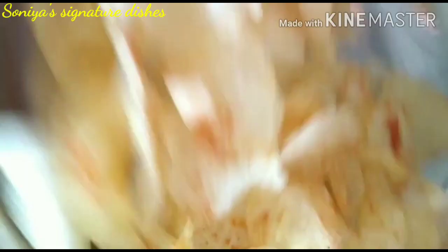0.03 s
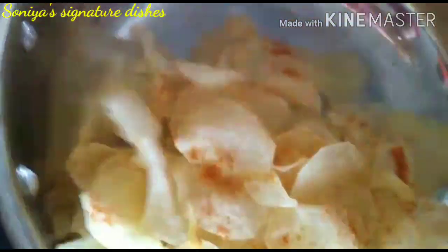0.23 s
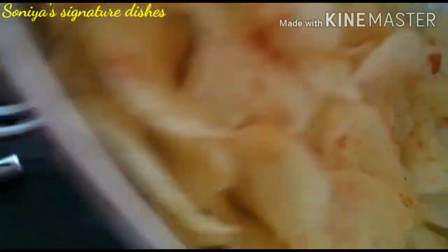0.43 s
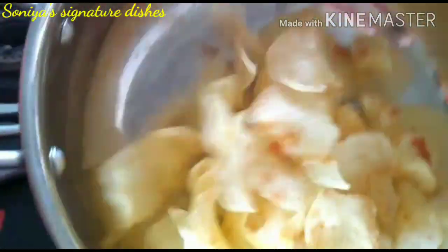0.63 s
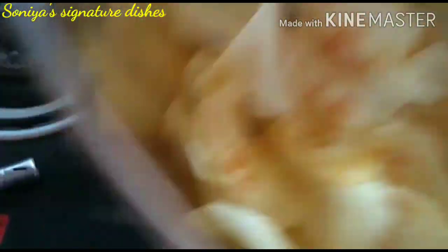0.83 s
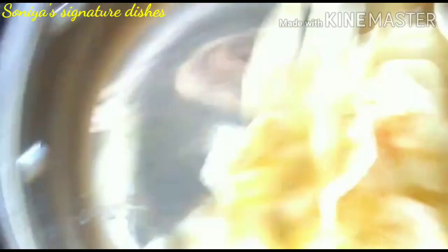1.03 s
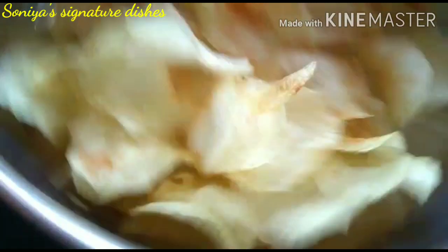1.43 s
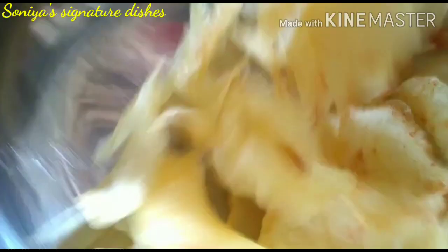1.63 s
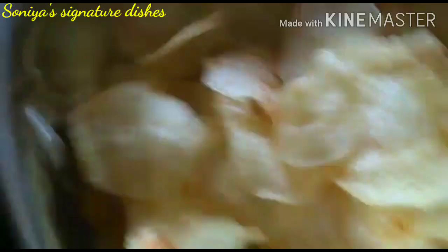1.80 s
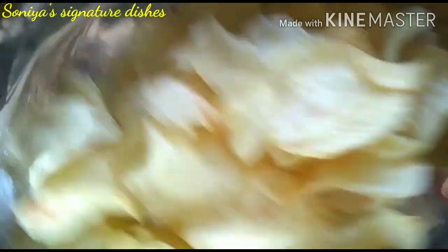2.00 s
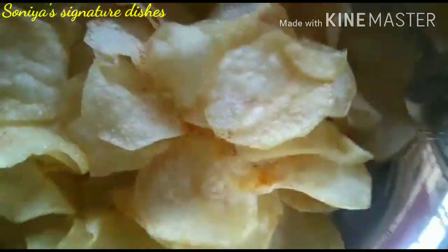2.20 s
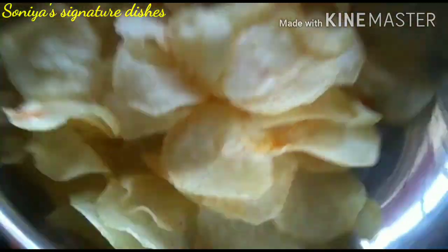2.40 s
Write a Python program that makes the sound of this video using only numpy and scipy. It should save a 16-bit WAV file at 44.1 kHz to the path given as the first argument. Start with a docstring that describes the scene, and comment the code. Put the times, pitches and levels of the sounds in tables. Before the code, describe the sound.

Crisp potato chips tossed in a steel pan, rustling and crackling in quick swells.

```python
"""Crisp potato chips are tossed in a steel pan in a kitchen, close to a two-port microphone.
Each toss is a swell of tiny brittle taps over a sliding rustle, and then the chips settle.
Single chips snap as they crack, or chatter as they slide. The pan rings faintly under them,
the nearby walls answer, and a low kitchen rumble with a hum goes on throughout."""
import sys
import numpy as np
from scipy import signal
from scipy.fft import rfft, irfft, next_fast_len
from scipy.io import wavfile
from scipy.ndimage import map_coordinates

SR = 44100
rng = np.random.default_rng(int(sys.argv[2]) if len(sys.argv) > 2 else 0)


def generate_wav(signal):
    """Clip the signal to [-1, 1] and save it as 16-bit WAV at the path in sys.argv[1]."""
    frames = np.transpose(np.atleast_2d(signal))
    scaled = np.clip(frames, -1, 1) * 32767
    pcm = np.round(scaled).astype(np.int16)
    wavfile.write(sys.argv[1], SR, pcm)


N = 112454


def chips(tap_db=-3.2, rustle_db=-5.2, clump_db=1, clumps_per_s=90, treble_hz=4700):
    """Tossed chips tap and slide against each other, moving in clumps that make the level flicker."""
    # tone colour of the chips in the pan: f/Hz, relative level/dB
    chip_colour = [(40, -65), (150, -27), (420, -14), (590, -4.5), (900, -7.5), (1200, -0.5), (1500, -6.5),
                   (2000, -2), (2330, 3.5), (2750, 1.5), (3350, 0.5), (3900, -0.5), (4400, 1), (5500, -1.5),
                   (7800, -5.5), (10000, -10.5), (12000, -14.5), (15000, -18.5)]
    strength, treble = tossing()
    wobble = map_coordinates(rng.standard_normal(600), [np.arange(N) / SR * clumps_per_s])
    clumps = unit(amp(clump_db * wobble))
    taps = unit(coloured(chip_taps(strength), chip_colour)) * np.sqrt(np.mean(strength ** 2))
    rustle = strength * coloured(noise(), chip_colour)
    both = clumps * (amp(tap_db) * taps + amp(rustle_db) * rustle)
    highs = filtered(both, lambda hz: hz ** 4 / (hz ** 4 + treble_hz ** 4))
    return both + (treble - 1) * highs


def tossing(settle_db=-24, settle_s=.2):
    """Each toss rises, holds, falls and settles; gives the chips' strength and treble gain over time."""
    # tosses: t/s at full strength, level/dB, rise/s, hold/s, fall/s, treble/dB
    # (rise, fall and settle_s are the times for a change of 20 dB)
    tosses = [(-.01, -37, .05, 0.014, 0.07, -8.5), (0.236, -15.5, 0.044, 0.063, 0.08, -0.5),
              (0.412, -26.5, 0.036, 0.03, 0.054, -5.5), (0.64, -30, 0.1, 0.048, 0.078, -7.5),
              (0.685, -16.5, 0.046, 0.06, 0.14, 0.5), (1.022, -35, 1, 0.029, 0.27, -2),
              (1.149, -13.5, 0.054, .016, 0.17, 0), (1.246, -16, 0.029, 0.0045, 0.077, 0.5),
              (1.323, -24.5, 0.13, 0.026, 0.053, 2.5), (1.466, -17, 0.081, 0.027, 0.029, 0.5),
              (1.55, -24.5, 0.12, 0.014, 0.058, -3.5), (1.618, -19, 0.16, 0.018, 0.073, 3.5),
              (1.773, -17, 0.084, 0.02, 0.1, 2.5), (1.822, -14, 0.075, 0.015, 0.032, -2.5),
              (1.891, -18.5, 0.079, 0.022, 0.075, 1), (2.056, -15.5, 0.097, 0.016, 0.073, 0.5),
              (2.147, -22.5, 0.11, 0.058, 0.1, 1), (2.225, -20.5, 0.017, 0.013, 0.072, -4),
              (2.349, -33.5, 0.62, 0.08, 0.067, -5)]
    t = np.arange(N) / SR
    power, treble = np.full(N, 1e-9), np.zeros(N)
    for s, db, rise, hold, fall, treble_db in tosses:
        before, after = np.maximum(s - t, 0), np.maximum(t - s - hold, 0)
        dying = amp(-20 * after / fall) + amp(settle_db - 20 * after / settle_s)
        swell = amp(db - 20 * before / rise) * dying
        power += swell ** 2
        treble += swell ** 2 * treble_db
    return np.sqrt(power), amp(treble / power)


def chip_taps(strength, tries=7000, samples=220, tones=9, crowding=.45, tap_spread_db=4, tone_spread_db=2.5):
    """Chips hit each other, more often in a strong toss; each tap rings with a few short random tones."""
    chance = rng.random((tries, 2 + 3 * tones))
    scatter = np.minimum(rng.standard_normal((tries, tones + 1)), 2)
    at = (chance[:, 0] * N).astype(int)
    density = (strength[at] / strength.max()) ** crowding
    keep = chance[:, 1] < density
    sizes = unit(amp(tap_spread_db * scatter[:, :1] + tone_spread_db * scatter[:, 1:]))
    gain = (sizes * (strength[at] / np.sqrt(density))[:, None])[keep]
    draws = chance[keep, 2:].reshape(-1, tones, 3)  # a pitch and two phases for each tone
    n, out = np.arange(samples), np.zeros((2, N))
    low_hz, high_hz = 450, 16000
    for k in range(tones):
        hz = low_hz * (high_hz / low_hz) ** ((k + draws[:, k, :1]) / tones)
        cycles = hz * n / SR
        decay_s = .0011 * (3000 / hz) ** .75  # higher tones die sooner
        fade = np.exp(-n / SR / decay_s) * (1 - n / samples) * (1 - np.exp(-2 * cycles))
        fade *= gain[:, k, None] * np.sqrt(hz) / np.linalg.norm(fade, axis=1, keepdims=True)
        for c in range(2):
            ring = fade * np.sin(2 * np.pi * (cycles + draws[:, k, c + 1, None]))
            out[c] += np.bincount((at[keep, None] + n).ravel(), ring.ravel(), N + samples)[:N]
    return out


def snaps(attack_s=.00025, crack_s=.018):
    """A single chip cracks with a burst of noise and rings briefly at its own pitch."""
    # snapping chips: t/s, level/dB, f/Hz, time to fade by 60 dB/s, crack relative to the ring/dB
    breaks = [(.1496, -29, 4250, .018, 1), (.2195, -18, 4000, .008, -4), (.2612, -10, 4600, .008, -7),
              (.2705, -6, 3300, .014, -12), (.2775, -9, 4900, .008, -6), (.2955, -8, 3350, .018, -11),
              (.4008, -15, 3450, .024, -5), (.6712, -3, 2700, .004, -11), (.7075, -10, 4400, .008, -2),
              (.7108, -8, 6200, .005, 0), (.7325, -12, 3400, .012, -8), (.7565, -8, 3300, .008, -5),
              (.8952, -25, 5300, .008, -2), (.9275, -26.5, 4700, .022, 4), (1.1049, -16, 5600, .012, -7),
              (1.1555, -6, 3600, .01, -7), (1.1678, -11, 5000, .005, -3), (1.2416, -12, 3500, .01, -6),
              (1.2525, -9, 5200, .006, -6), (1.2572, -9, 4400, .008, -6), (1.3197, -8, 5400, .012, -2),
              (1.3262, -9, 6000, .01, -3), (1.4045, -18, 4500, .008, -5), (1.4765, -10, 3900, .008, -7),
              (1.6245, -11, 7900, .01, -5), (1.7042, -19, 5500, .01, -6), (1.7419, -17, 5800, .012, -3),
              (1.8132, -5, 3500, .008, -5), (1.8268, -9, 3200, .014, -11), (1.909, -12, 4500, .006, -5),
              (2.0185, -14, 5200, .008, -6), (2.1145, -11, 3600, .008, -7), (2.1548, -16, 5000, .005, -2),
              (2.2235, -11, 3400, .008, -7), (2.3575, -22, 3000, .014, -7), (2.4025, -21, 4500, .01, -7)]
    # tones of a snapping chip: multiple of its pitch, relative level/dB
    chip_tones = [(1, -1), (1.14, -9), (1.65, -19)]
    # tone colour of the crack: f/Hz, relative level/dB
    crack_colour = [(60, -40), (500, -1), (1500, -5), (4000, 5.5), (9000, 0), (15000, -11.5)]
    t = np.arange(SR // 20) / SR
    rings, cracks = np.zeros((2, N + SR)), np.zeros(N + SR)
    for s, db, hz, ring_s, crack_db in breaks:
        i = round(s * SR)
        onset = amp(db) * (1 - np.exp(-t / attack_s))
        ring = sum(amp(level) * np.sin(2 * np.pi * (hz * ratio * t + rng.random((2, 1))))
                   for ratio, level in chip_tones)
        rings[:, i:i + len(t)] += onset * amp(-60 * t / ring_s) * ring
        cracks[i:i + len(t)] += onset * amp(crack_db - 60 * t / crack_s)
    return rings[:, :N] + cracks[:N] * coloured(noise(), crack_colour)


def chatters(slips_per_s=670, ring_cycles=61):
    """A sliding chip slips unevenly, and each slip keeps the chip or the pan ringing at one pitch."""
    # sliding chips, plus two brief knocks on the pan (1.145 s and 1.783 s): t/s, length/s, f/Hz, level/dB
    slides = [(.225, .11, 3400, -20), (.275, 0.055, 2320, -43), (.38, 0.15, 1310, -40),
              (0.593, 0.11, 1400, -36), (0.699, 0.2, 3310, -29.5), (1.011, 0.12, 1280, -38.5),
              (1.145, 0.029, 740, -27), (1.783, 0.049, 550, -35), (1.98, 0.16, 7560, -35.5),
              (2.129, 0.086, 2640, -34), (2.316, 0.26, 577, -39.5)]
    t, out = np.arange(SR // 8) / SR, np.zeros((2, N + SR))
    for s, length, hz, db in slides:
        i, n = round(s * SR), int(length * SR)
        slips = (rng.random(SR) < slips_per_s / SR) * np.sign(rng.standard_normal((2, SR)))
        ring = amp(-60 * hz * t / ring_cycles) * np.sin(2 * np.pi * hz * t)
        rung = signal.fftconvolve(slips, ring[None], axes=1)[:, len(t):len(t) + n]
        swell = np.sin(np.pi * np.arange(n) / n)
        out[:, i:i + n] += amp(db) * unit(rung) * swell
    return out[:, :N]


def pan(crisp, relative_db=-22.5):
    """The chips set the steel pan ringing faintly at its own tones."""
    # tones of the pan: f/Hz, relative level/dB, time to fade by 60 dB/s
    pan_tones = [(321, -4.5, 0.26), (587, 3, 0.19), (780, -7, 0.45), (1225, -7.5, 0.21), (1299, 3, 0.54),
                 (3200, 4, 0.26), (3310, 14, 0.25), (5850, -4, .2)]
    t = np.arange(SR // 2) / SR
    ring = sum(amp(db - 60 * t / ring_s) * np.sin(2 * np.pi * hz * t) for hz, db, ring_s in pan_tones)
    rung = signal.fftconvolve(np.abs(crisp) * noise(), ring[None], axes=1)[:, :N]
    return amp(relative_db) * crisp.std() * unit(rung)


def kitchen_echo(crisp, relative_db=-9, fade_s=.042, delay_s=.004):
    """The hob and nearby walls throw back a very short echo."""
    t = np.arange(SR // 3) / SR
    tail = rng.standard_normal((2, len(t))) * amp(-60 * t / fade_s) * (t > delay_s)
    tail /= np.linalg.norm(tail[0])
    return amp(relative_db) * signal.fftconvolve(crisp, tail, axes=1)[:, :N]


def background(rumble_db=-3, hum_db=-4, rush_db=-.5):
    """The kitchen's low rumble, hum and hollow rush slowly grow louder and softer."""
    # loudness over time: t/s, rumble and hum level/dB, rush level/dB
    levels = [(0.0, -46.5, -43), (0.29, -40, -38.5), (0.72, -38, -42.5), (0.76, -48.5, -37.5),
              (1.059, -41.5, -44), (1.4, -45, -42), (1.51, -41.5, -40), (2.03, -38.5, -33.5),
              (2.5, -33, -39.5)]
    # tone colours of the rumble and the rush: f/Hz, relative level/dB
    rumble_colour = [(25, -69), (55, -95), (75, -19), (92, -18), (122, 4), (145, -4.5), (165, 0.5),
                     (250, -1), (400, -3), (600, -11.5), (1500, -60)]
    rush_colour = [(200, -20), (420, -4.5), (590, 1.5), (850, -3.5), (1280, -1), (1650, -7.5),
                   (2500, -20.5), (5000, -18.5), (15000, -38)]
    s, *curves = np.transpose(levels)
    bass, middle = [amp(np.interp(np.arange(N) / SR, s, db)) for db in curves]
    rumble = amp(rumble_db) * coloured(noise(), rumble_colour)
    rush = amp(rush_db) * coloured(noise(), rush_colour)
    return bass * (rumble + amp(hum_db) * hum()) + middle * rush


def hum(waver_hz=6, waver_db=4, wavers_per_s=22):
    """A few humming tones, each wavering at random in loudness and pitch."""
    # tones of the kitchen hum: f/Hz, relative level/dB
    hum_tones = [(90, -8), (116, 3.5), (160, -1), (333, 1.5), (597, 1), (1100, -4)]
    steps, out = np.arange(N) / SR * wavers_per_s, np.zeros((2, N))

    def waver():
        return np.array([map_coordinates(points, [steps]) for points in rng.standard_normal((2, 200))])
    for hz, db in hum_tones:
        gain = amp(db + waver_db * waver())
        pitch = hz + waver_hz * waver()
        out += gain * np.sin(2 * np.pi * np.cumsum(pitch, axis=1) / SR)
    return unit(out)


def microphone(pair):
    """Two ports (sound openings) hear partly alike signals, the left one later and duller."""
    # how the ports compare: f/Hz, likeness from 0 to 1, phase by which the left leads/rad
    ports = [(100, .4, .3), (400, .55, .45), (1150, .98, 0), (1450, .75, -.3), (1700, .3, -1.3),
             (1980, .82, -2.75), (2150, .997, -3.09), (2300, 1, -3.14), (2440, .997, -3.19),
             (2600, .8, -3.6), (2900, .3, -4.3), (3200, .78, -5.7), (3550, .92, -6.2), (4050, .3, -7.4),
             (4350, .65, -9), (4750, .8, -9.2), (5300, .45, -11.7), (6150, .4, -12.4), (7100, .5, -15),
             (9300, .36, -20.6), (14000, .2, -30)]
    # balance of the ports: f/Hz, left minus right level/dB
    balance = [(150, 1.5), (550, -1), (1500, -0.2), (3000, 0.5), (4500, -3), (6500, -3.5), (9500, -5.5),
               (14000, -4)]
    f, alike, lead = np.transpose(ports)

    def response(hz, sign):
        turn = np.arccos(np.clip(np.interp(hz, f, alike), 0, 1)) / 2  # 0: both hear the same signal
        side = amp(sign * along(balance, hz) / 2) * np.exp(sign * 1j * np.interp(hz, f, lead) / 2)
        return side * np.array([np.cos(turn), sign * np.sin(turn)])
    return np.array([filtered(pair, lambda hz: response(hz, sign)).sum(axis=0) for sign in (1, -1)])


def amp(db):
    """Turn decibels into a gain."""
    return 10 ** (np.asarray(db) / 20)


def unit(x):
    """Scale a signal to an average power of 1."""
    return x / np.sqrt(np.mean(x ** 2) + 1e-20)


def along(points, hz):
    """Read between (f/Hz, value) points on a logarithmic frequency scale."""
    f, v = np.transpose(points)
    return np.interp(np.log(hz + 1), np.log(f + 1), v)


def filtered(x, response):
    """Change the gain and phase of each frequency in x by response(hz)."""
    m = next_fast_len(N + SR // 4)
    return irfft(rfft(x, m) * response(np.fft.rfftfreq(m, 1 / SR)), m)[..., :N]


def coloured(x, colour):
    """Give a white signal a tone colour and keep its power."""
    return filtered(x, lambda hz: unit(amp(along(colour, hz))))


def noise():
    """Two unrelated white noises."""
    return rng.standard_normal((2, N))


def scene():
    """Chips, pan, echo and background reach the microphone together."""
    crisp = chips() + snaps() + chatters()
    return microphone(crisp + pan(crisp) + kitchen_echo(crisp) + background())


def record(dry):
    """The recorder clips at full scale, thins the deepest bass and cuts off the highest treble."""
    low_hz, top_hz = 57, 15400
    clipped = np.clip(dry, -1, 1)
    return filtered(clipped, lambda hz: (hz < top_hz) * hz ** 2 / np.hypot(hz ** 2, low_hz ** 2))


dry = scene()
out = record(dry)
generate_wav(out)
```